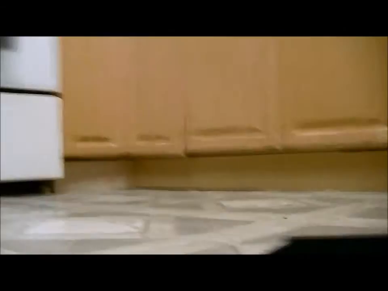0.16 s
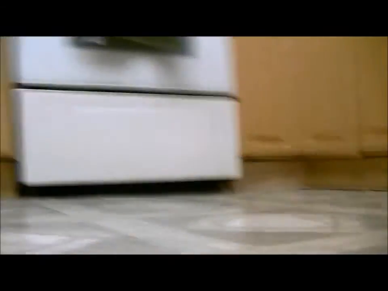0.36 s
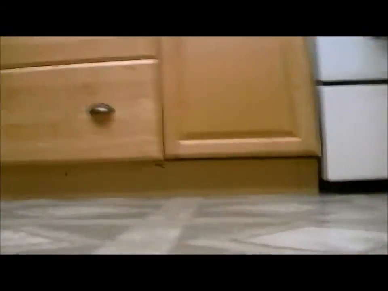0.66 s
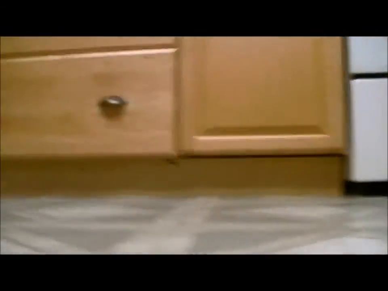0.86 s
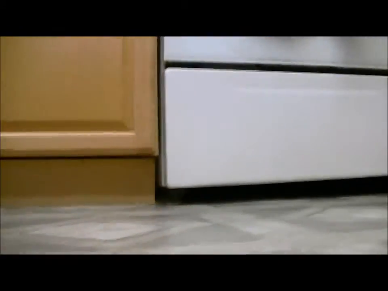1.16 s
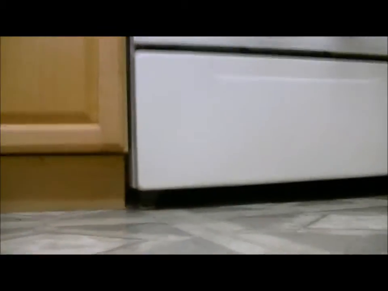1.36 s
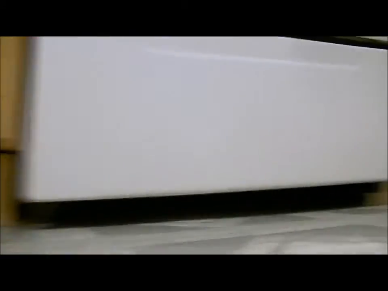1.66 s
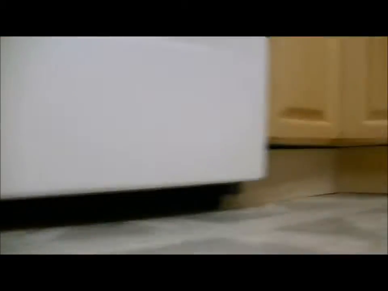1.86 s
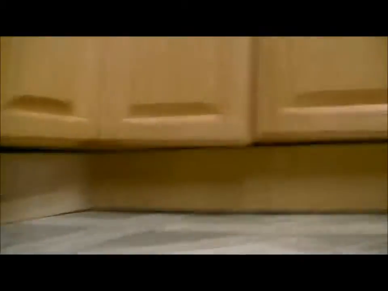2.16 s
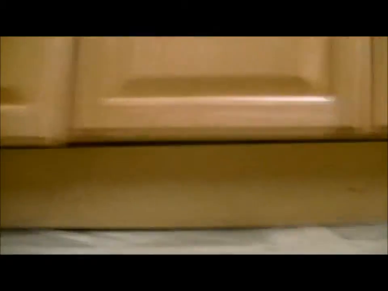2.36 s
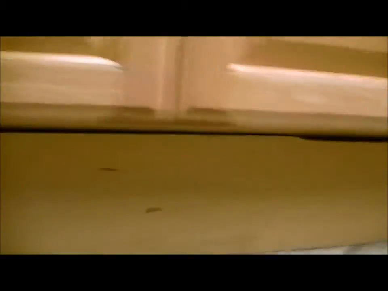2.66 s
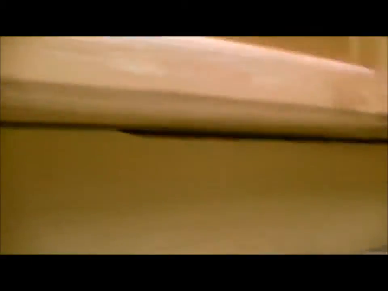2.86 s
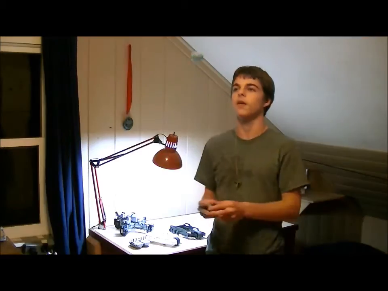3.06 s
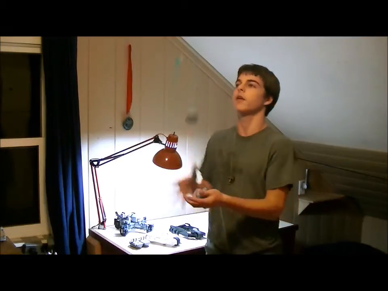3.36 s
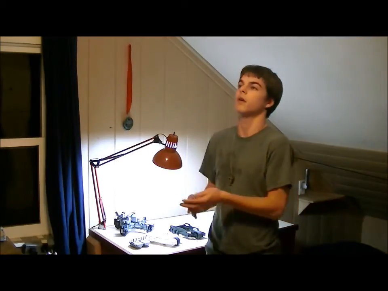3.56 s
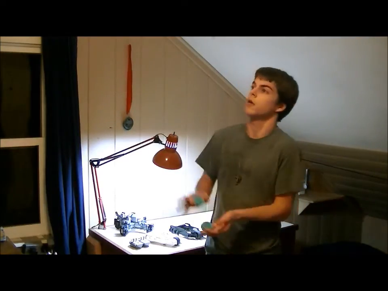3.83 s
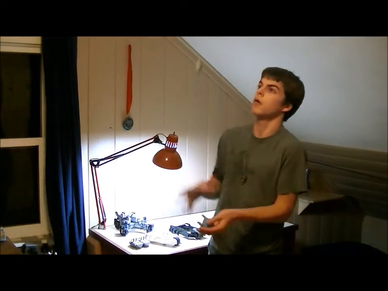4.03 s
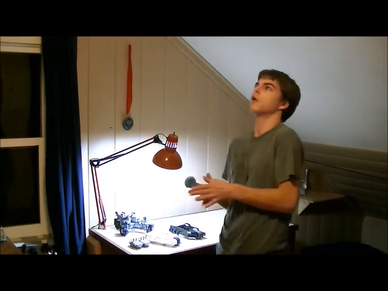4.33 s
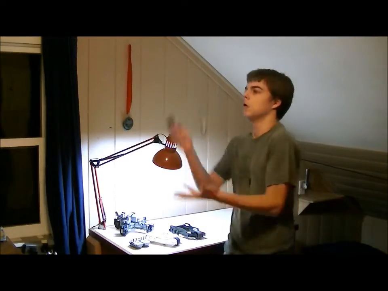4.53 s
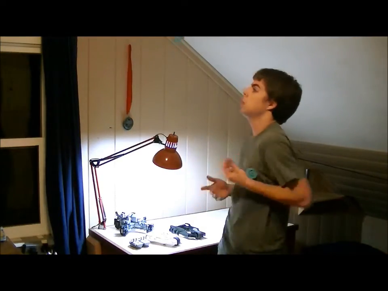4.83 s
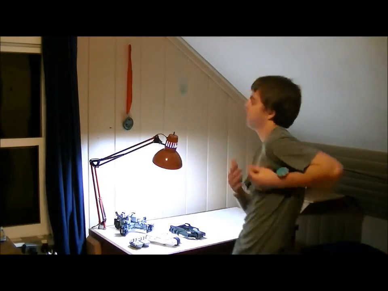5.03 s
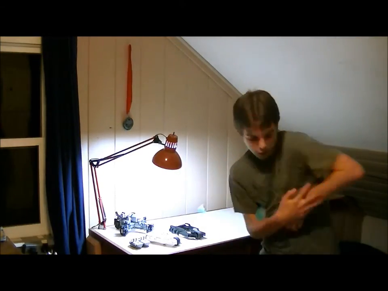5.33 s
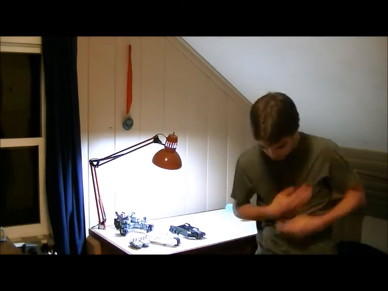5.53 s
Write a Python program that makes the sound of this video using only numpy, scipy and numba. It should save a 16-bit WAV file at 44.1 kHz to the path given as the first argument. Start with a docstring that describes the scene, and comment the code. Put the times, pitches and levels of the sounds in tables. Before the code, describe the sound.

A plastic toy car rolls over a hard kitchen floor with the microphone riding on it. Its wheels grind, rumble and chatter, with many sharp clicks and hollow knocks. About halfway through, the sound cuts to a small, quiet bedroom with faint hiss. Small light objects chink together, then click and slap into hands as someone juggles, ending in a quick fumble with rustling cloth.

```python
"""Toy car, then juggling.

A plastic toy car rolls over a kitchen floor with the microphone riding on it: the wheels grind and
rumble, jolt over the floor's pattern and chatter on their axles. Then an abrupt change to a small
bedroom, where someone juggles small light objects that click together and slap into hands and chest.
A limiter ducks after the hard catches."""
import sys
import numpy as np
from scipy import signal
from scipy.fft import rfft, irfft
from scipy.io import wavfile
from numba import njit

SR = 44100
rng = np.random.default_rng(int(sys.argv[2]) if len(sys.argv) > 2 else 0)


def write(x):
    x = np.atleast_2d(x).T
    wavfile.write(sys.argv[1], SR, np.round(np.clip(x, -1, 1) * 32767).astype(np.int16))


N = 250929
T = np.arange(N) / SR
BEDROOM_START_S = 2.91

# wheel grind, rising with speed: time_s, level_db
RIDE = [(0.0, -36), (0.02, -39), (0.31, -39), (0.41, -35), (0.61, -36), (0.62, -45.5), (0.86, -37),
        (1.23, -32), (1.24, -26.5), (1.28, -33.5), (1.49, -28), (1.5, -23.5), (1.64, -29), (1.98, -35.5),
        (2.02, -27.5), (2.2, -27.5), (2.24, -31.5), (2.9, -35)]


def car():
    """The car close up, with a faint return from the cabinets; sharp clicks softly overload the mic."""
    ride_db = curve(RIDE)
    jolt_s, click_db, knock_db = jolts()
    near = rolling(ride_db, jolt_s, knock_db) + chassis_thumps()
    chatter_db, centre_hz = shimmy(ride_db)
    near += axle_chatter(chatter_db, centre_hz, jolt_s, click_db)
    decay = fade(t60_s=0.026)
    cabinets = undb(-17) * ring(near, decay * rng.standard_normal(len(decay)))
    return 0.67 * np.tanh((near + cabinets) / 0.63)


# spectra of wheel grind, jolted shell and chassis rumble: freq_hz, gain_db
GRIND_COLOUR = [(150, -29), (300, 1), (600, -4), (1300, 3.5), (1900, 4.5), (2800, -1), (4200, 0), (5500, 4),
                (9500, -6), (11500, -9.5), (16000, -44)]
SHELL_COLOUR = [(150, 0.5), (400, 7), (1300, 1), (2800, 0.5), (4200, 8), (9500, 2.5), (14000, -0.5),
                (16000, -11.5)]
RUMBLE_COLOUR = [(25, -29.5), (55, -46), (90, -6.5), (125, -2), (165, 0), (220, -6.5), (330, -15),
                 (900, -46)]


def rolling(ride_db, jolt_s, knock_db, patchy_db=1.5, sway_db=3.0):
    """Rough patches, dirt specks and jolts shake the shell; the chassis rumbles below."""
    knocks = bursts(jolt_s, knock_db + 3.5, t60_s=0.046)
    roughness = undb(ride_db + 2.5 + patchy_db * flicker(per_s=81))
    grind = colour(roughness * grit(per_s=9800, spread_db=6.5), GRIND_COLOUR)
    specks = undb(-4.5) * roughness * grit(per_s=230, spread_db=1.5)
    shell = colour(specks + knocks * grit(per_s=6000, spread_db=10.5), SHELL_COLOUR)
    sway = undb(ride_db - 8 + sway_db * flicker(per_s=39))
    rumble = colour(noise() * (sway + undb(-14.5) * knocks), RUMBLE_COLOUR)
    return grind + shell + rumble


# hardest wheel jolts: time_s, click_db, knock_db
HARD_JOLTS = [(0.0535, 1, -23), (0.074, 5, -23), (0.1639, 0, -44), (0.231, 6.5, -22), (0.3464, -6, -19.5),
              (0.417, -12, -15.5), (0.48, -4.5, -19.5), (0.5322, -8, -28), (0.602, 2, -24),
              (0.61, 1.5, -43), (0.663, -8.5, -41), (0.8684, 5, -35), (0.9781, -1, -21),
              (1.0416, -4.5, -40), (1.0896, -2, -20.5), (1.2088, -5, -23), (1.2523, -24.5, -17),
              (1.306, -4, -17.5), (1.5025, -21, -27.5), (1.5324, -16, -17), (1.548, -11, -5.5),
              (1.5916, 2.5, -11.5), (1.697, 10, -21.5), (1.8045, 2, -19), (1.8308, 4, -13.5),
              (1.8867, 8.5, -22), (1.958, 2, -26), (2.0384, -0.5, -15), (2.0874, -1, -14),
              (2.148, -5, -14.5), (2.184, -4, -14), (2.206, 8, -15.5), (2.2735, 5, -45.5), (2.351, -4, -14),
              (2.4571, 1, -13.5), (2.601, -12.5, -17.5), (2.6269, 6.5, -16.5), (2.7362, 4, -23),
              (2.838, -12.5, -19)]


def jolts():
    """Hard jolts and random lesser ones click the axles and knock the shell: time_s, click_db, knock_db."""
    time_s, level_db = sprinkle(0, BEDROOM_START_S, RIDE, per_s=30, scatter_db=5.5)
    lesser = np.column_stack([time_s, level_db + 16, level_db + 4])
    return np.vstack([HARD_JOLTS, lesser]).T


# bouts of wheel shimmy: start_s, length_s, level_db, start_hz
SHIMMIES = [(-0.02, 0.085, -16.5, 5850), (0.128, 0.036, -17, 6600), (0.217, 0.081, -26, 7000),
            (0.525, 0.034, -3.5, 6950), (0.645, 0.2, -34.5, 7300), (0.78, 0.2, -15.5, 6500),
            (0.961, 0.063, -12.5, 7200), (1.517, 0.17, -16.5, 7100), (1.687, 0.26, -8, 7420),
            (2.111, 0.16, -9.5, 8000), (2.271, 0.11, -7, 7140), (2.379, 0.078, -10.5, 6740),
            (2.596, 0.069, -19, 6600), (2.704, 0.23, -13.5, 7860)]


def shimmy(ride_db, attack_s=0.017, release_s=0.022, rest_hz=5870.0, sag_hz_per_s=10300):
    """Chatter level and ring centre: wheels shake with speed, after hard jolts and most in bouts."""
    jolt_s, click_db, _ = np.transpose(HARD_JOLTS)
    shake = bursts(jolt_s, click_db - 15, t60_s=0.18)
    power = undb(ride_db - 2.5) ** 2 + shake ** 2
    centre_hz = np.full(N, rest_hz)
    for start_s, length_s, level_db, start_hz in SHIMMIES:
        age_s = T - start_s
        gate = np.clip(np.minimum(age_s / attack_s, (length_s - age_s) / release_s), 0, 1)
        power += (undb(level_db) * gate) ** 2
        centre_hz = np.where(gate > 0, start_hz - sag_hz_per_s * age_s, centre_hz)
    return 10 * np.log10(power), centre_hz


# resonances of a loose wheel: pitch_hz, width_hz, level_db
WHEEL_MODES = [(5540, 260, -4), (6400, 380, 0), (6950, 600, -3), (7700, 650, -4), (11800, 2600, -17),
               (14900, 1200, -17)]


def axle_chatter(chatter_db, centre_hz, jolt_s, click_db, gap_s=0.0035, scatter_db=3, reach_hz=800):
    """Loose wheels bounce on their axles; each contact is a tiny scrape that rings the plastic."""
    gap_draw, size_draw = rng.standard_normal((1500, 2)).T
    bounce_s = np.cumsum(gap_s * np.exp(0.4 * gap_draw))
    bounce_db = np.interp(bounce_s, T, chatter_db) + scatter_db * np.minimum(size_draw, 1.5) + 0.5
    bounces = bursts(bounce_s, bounce_db, t60_s=0.009)
    clicks = bursts(jolt_s, click_db - 6.5, t60_s=0.011)
    contact = np.hypot(bounces, clicks)
    wheel = 0
    for pitch_hz, width_hz, level_db in WHEEL_MODES:
        # the contact wanders over the rim, favouring modes near centre_hz
        favour = 0.93 + np.exp(-((pitch_hz - centre_hz) / reach_hz) ** 2)
        scrape = contact * unit(band(noise(), pitch_hz - 1100, pitch_hz + 1100, order=2))
        t60_s = np.log(1000) / (np.pi * width_hz)
        wheel += undb(level_db - 16) * favour * ring(scrape, mode(pitch_hz, t60_s))
    crack = (undb(-12.5) * bounces + undb(-15.5) * clicks) * noise()
    return wheel + crack


# chassis knocks: start_s, level_db, pitch_hz
THUMPS = [(0.419, -16, 4100), (0.42, -16.5, 1630), (1.241, -14.5, 2000), (1.258, -14.5, 1280),
          (1.306, -18.5, 504), (1.335, -17.5, 1200), (1.511, -8, 1320)]


def chassis_thumps():
    """Hollow knocks as the chassis bottoms out."""
    return sum(place(start_s, undb(level_db + 1.5) * blow(pitch_hz / 1.5, pitch_hz * 1.13, order=2))
               for start_s, level_db, pitch_hz in THUMPS)


# catches on palm and chest: start_s, slap_db, top_hz, click_db, snap_db
CATCHES = [(3.7425, -6.5, 657, -6.5, -23), (4.154, 16, 2120, -3.5, -13.5), (4.4405, 7, 2210, -4, -25),
           (4.614, -17, 1213, -8.5, -44), (4.763, -9, 1940, -13.5, -31), (4.782, -16, 2040, -9, -30),
           (5.029, -8, 1820, -26, -28.5), (5.102, -15.5, 1780, -23, -37), (5.16, -5, 2040, -11, -20),
           (5.178, -16, 1960, -10.5, -19.5), (5.2905, 13, 1920, -5.5, -18.5), (5.503, -25, 508, -25.5, -33),
           (5.616, 3.5, 1910, -7, -19.5), (5.671, -22.5, 420, -23, -39)]


def juggling(firm_low_hz=384, firm_top_hz=2000):
    """Catches slap, each with its own brightness; the objects sound and cloth rubs."""
    # random fumbling touches slap at one fixed brightness
    touch_s, rub_db = sprinkle(BEDROOM_START_S, T[-1], RUSTLE, per_s=30, scatter_db=4)
    touches = [(start_s, db + 6, firm_top_hz, db + 8, db - 7.5) for start_s, db in zip(touch_s, rub_db)]
    contacts = np.vstack([CATCHES, touches])
    slaps = 0
    for start_s, slap_db, top_hz, _, _ in contacts:
        low_hz = firm_low_hz * (top_hz / firm_top_hz) ** 0.61
        slaps += place(start_s, undb(slap_db - 2) * blow(low_hz, top_hz, order=5))
    return slaps + object_clicks(contacts) + object_chinks() + object_pings() + cloth()


# objects touching without a catch: start_s, click_db, snap_db
CLICKS = [(3.24, -33, -58), (3.4722, -17.5, -24.5), (3.557, -39, -22.5), (3.5625, -8.5, -45),
          (3.9097, -30, -48), (4.0185, -35, -51.5), (4.2716, -27, -41), (4.6026, -18, -26)]
# click spectrum: freq_hz, gain_db
CLICK_COLOUR = [(300, -29.5), (1200, 1), (3000, 6.5), (5000, 7), (7000, 6.5), (9000, -0.5), (12000, -20),
                (16000, -33)]


def object_clicks(contacts, lead_s=0.0024):
    """Objects click together with a treble snap, on their own or just before the palm stops them."""
    in_hand = [(start_s - lead_s, click_db, snap_db) for start_s, _, _, click_db, snap_db in contacts]
    start_s, click_db, snap_db = np.vstack([CLICKS, in_hand]).T
    clicks = colour(bursts(start_s, click_db - 7.5, t60_s=0.0086) * noise(), CLICK_COLOUR)
    snaps = bursts(start_s, snap_db, t60_s=0.019) * unit(band(noise(), 6000, 14000, order=2))
    return clicks + snaps


# chinks in the hand: start_s, level_db
CHINKS = [(2.969, -30.5), (2.9961, -13.5), (3.019, -21.5), (3.0482, -19.5), (3.123, -36), (3.166, -36)]
# chink spectrum: freq_hz, gain_db
CHINK_COLOUR = [(500, -43.5), (3000, -20), (4800, -17.5), (5600, -0.5), (6400, -1), (8000, -9.5),
                (11000, -17.5), (16000, -27)]


def object_chinks():
    """Objects chink brightly in the hand."""
    start_s, level_db = np.transpose(CHINKS)
    return undb(-5.5) * colour(bursts(start_s, level_db, t60_s=0.025) * noise(), CHINK_COLOUR)


# ringing objects: start_s, pitch_hz, level_db, t60_s
PINGS = [(3.743, 7100, -41, .12), (4.701, 8270, -31.5, 0.02), (5.179, 1563, -30, .4)]


def object_pings(max_t60_s=1 / 3):
    """A knocked object rings on at one pitch."""
    return sum(place(start_s, undb(level_db) * mode(pitch_hz, min(t60_s, max_t60_s)))
               for start_s, pitch_hz, level_db, t60_s in PINGS)


# deep thuds: start_s, level_db
THUDS = [(3.743, -27), (5.291, -19.5)]


def low_thuds(low_hz=44, high_hz=218):
    """A deep thud sounds with two of the catches."""
    return sum(place(start_s, undb(level_db) * blow(low_hz, high_hz, order=1))
               for start_s, level_db in THUDS)


# rubbing from arm movement: time_s, level_db
RUSTLE = [(2.91, -58), (3.8, -57.5), (4.1, -58.5), (4.249, -66.5), (4.55, -76), (4.85, -40), (4.96, -41),
          (5.019, -28.5), (5.27, -29), (5.35, -48), (5.69, -54)]
# cloth spectrum: freq_hz, gain_db
RUSTLE_COLOUR = [(150, -17), (350, 9), (900, 7.5), (1600, -5.5), (3000, -16.5), (6500, -9), (12000, -18.5),
                 (16000, -25.5)]


def cloth():
    """Sleeves and hands rub as the arms move."""
    return colour(grit(per_s=2500, spread_db=4), RUSTLE_COLOUR) * undb(curve(RUSTLE) - 11.5)


# bedroom resonances: pitch_hz, level_db, t60_s
ROOM_MODES = [(163, 6, 0.15), (284.6, -2, 0.5), (331.3, 3.5, 0.2), (385.6, -3.5, 0.3), (463.8, 0.5, 0.16),
              (737, -3.5, 0.24), (1020, -8.5, .24), (1304, -6, 0.21), (2850, -10.5, 0.38)]


def bedroom(direct, spots=8, max_t60_s=1 / 3):
    """Direct sound, standing waves and reflections that differ at each spot the juggler moves to."""
    spot = np.floor(spots * (T - BEDROOM_START_S) / (T[-1] - BEDROOM_START_S))
    reflections = sum(ring(direct * (spot == k), echo()) for k in range(spots))
    standing = sum(undb(level_db) * mode(pitch_hz, min(t60_s, max_t60_s))
                   for pitch_hz, level_db, t60_s in ROOM_MODES)
    return direct + undb(3.5) * reflections + undb(-7.5) * ring(direct, standing)


# bedroom echo decay: freq_hz, t60_s
ROOM_DECAY = [(200, 0.34), (530, 0.19), (1400, 0.17), (3700, 0.18), (10000, 0.13)]


def echo(rise_s=0.0004, bands=9):
    """One pattern of dense reflections whose treble dies first."""
    freq_hz, t60_s = np.transpose(ROOM_DECAY)
    edges_hz = np.geomspace(100, 18000, bands + 1)
    tail = 0
    for low_hz, high_hz in zip(edges_hz, edges_hz[1:]):
        decay = fade(np.interp(np.log(low_hz * high_hz) / 2, np.log(freq_hz), t60_s))
        reflections = unit(band(rng.standard_normal(len(decay)), low_hz, high_hz))
        tail += reflections * np.sqrt(high_hz - low_hz) * decay
    return tail * np.minimum(T[:len(tail)] / rise_s, 1)


# hiss spectrum: freq_hz, gain_db
HISS_COLOUR = [(30, -19), (90, -1.5), (250, -3.5), (450, -15.5), (900, -18.5), (3000, -15), (8000, -19),
               (16000, -29.5)]


def hiss(level_db=-52.5):
    """The bedroom's steady hiss."""
    return undb(level_db) * colour(noise(), HISS_COLOUR)


def undb(db):
    """Decibels to gain."""
    return 10 ** (np.asarray(db) / 20)


def unit(x):
    """Scale to rms 1."""
    return x / np.sqrt(np.mean(x ** 2))


def noise():
    """White noise, N samples."""
    return rng.standard_normal(N)


def grit(per_s, spread_db):
    """Random tiny impacts of unequal size."""
    chance, size = rng.random(N), noise()
    return unit((chance < per_s / SR) * np.sign(size) * undb(spread_db * np.minimum(np.abs(size), 3)))


def flicker(per_s):
    """A random wobble with rms 1."""
    knots_s = np.arange(0, T[-1] + 1, 1 / per_s)
    return unit(np.interp(T, knots_s, rng.standard_normal(4000)[:len(knots_s)]))


def curve(table):
    """A time table's level at every sample."""
    return np.interp(T, *np.transpose(table))


def sprinkle(start_s, end_s, levels, per_s, scatter_db, count=300):
    """Unevenly spaced events scattered round a level table: time_s, level_db."""
    jitter, size = rng.random((count, 2)).T
    time_s = start_s + (np.arange(count) + jitter) / per_s
    level_db = np.interp(time_s, *np.transpose(levels)) + scatter_db * np.sqrt(3) * (2 * size - 1)
    return time_s[time_s < end_s], level_db[time_s < end_s]


def fade(t60_s, size=20000):
    """An exponential decay."""
    return np.exp(-np.log(1000) * T[:size] / t60_s)


def mode(pitch_hz, t60_s):
    """One decaying resonance."""
    decay = fade(t60_s)
    return decay * np.sin(2 * np.pi * pitch_hz * T[:len(decay)])


def bursts(start_s, level_db, t60_s):
    """An envelope that jumps at each start and dies away; overlaps add in power."""
    index = np.clip(np.asarray(start_s) * SR, 0, N).astype(int)
    pulses = np.bincount(index, undb(level_db) ** 2, N + 1)[:N]
    power = signal.fftconvolve(pulses, fade(t60_s) ** 2)[:N]
    return np.sqrt(np.abs(power))


def blow(low_hz, high_hz, order, size=2048):
    """A band-limited push with peak 1."""
    shape = band(signal.unit_impulse(size), low_hz, high_hz, order)
    return shape / np.abs(shape).max()


def place(start_s, sound):
    """Lay a short sound on the timeline."""
    return np.concatenate([np.zeros(int(start_s * SR)), sound, np.zeros(N)])[:N]


def band(x, low_hz, high_hz, order=3):
    """Butterworth band-pass."""
    return signal.sosfilt(signal.butter(order, [low_hz, high_hz], "band", fs=SR, output="sos"), x)


def ring(x, response):
    """Pass x through an impulse response scaled to unit energy."""
    return signal.fftconvolve(x, response / np.linalg.norm(response))[:len(x)]


def colour(x, spectrum, size=4096):
    """Causal unit-energy filter shaped like a spectrum table, built from its cepstrum."""
    freq_hz, gain_db = np.transpose(spectrum)
    bins_hz = np.maximum(np.fft.rfftfreq(size, 1 / SR), 1)
    gain = undb(np.interp(np.log(bins_hz), np.log(freq_hz), gain_db))
    cepstrum = irfft(np.log(gain))
    cepstrum[1:size // 2] *= 2
    cepstrum[size // 2 + 1:] = 0
    return ring(x, irfft(np.exp(rfft(cepstrum))))


@njit
def follow(x, attack, release):
    """Peak follower with separate rise and fall rates per sample."""
    out, peak = np.empty(len(x)), 0.
    for i in range(len(x)):
        peak += (abs(x[i]) - peak) * (attack if abs(x[i]) > peak else release)
        out[i] = peak
    return out


def scene():
    """The ride, then at once the bedroom."""
    room = bedroom(juggling()) + low_thuds() + hiss()
    return np.where(T < BEDROOM_START_S, car(), room)[None]


def record(dry, limit_db=-12, attack_s=0.003, late_s=0.001, release_s=0.31,
           bass_hz=55, crunch_hz=260, top_hz=15800):
    """A late limiter lets a catch's first cycles clip, ducks and recovers slowly; bass and top are cut."""
    peak = follow(dry[0], 1 / (attack_s * SR), 1 / (release_s * SR))
    late_peak = np.interp(T - late_s, T, peak)
    limited = dry * np.minimum(1, undb(limit_db) / (late_peak + 1e-9))
    overload = np.clip(limited, -1, 1) - limited
    crunch = signal.sosfiltfilt(signal.butter(2, crunch_hz, "high", fs=SR, output="sos"), overload)
    out = signal.sosfilt(signal.butter(2, bass_hz, "high", fs=SR, output="sos"), limited + crunch)
    return signal.sosfilt(signal.ellip(10, 0.2, 70, top_hz, fs=SR, output="sos"), out)


dry = scene()
out = record(dry)
write(out)
```